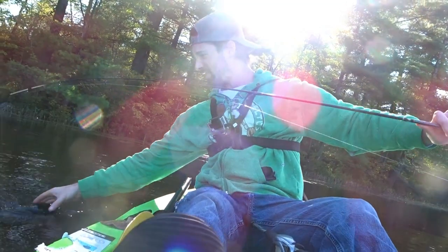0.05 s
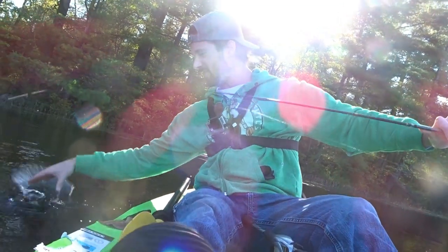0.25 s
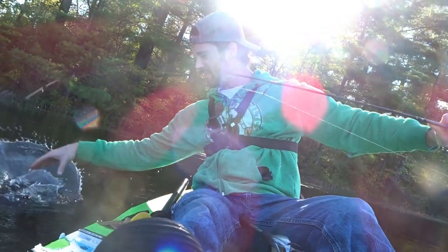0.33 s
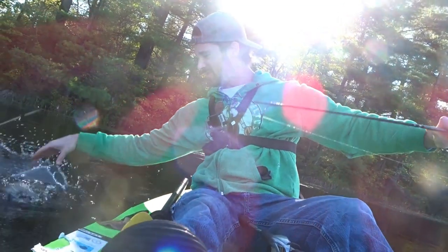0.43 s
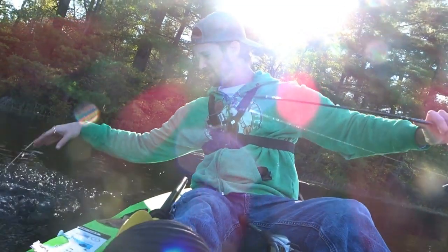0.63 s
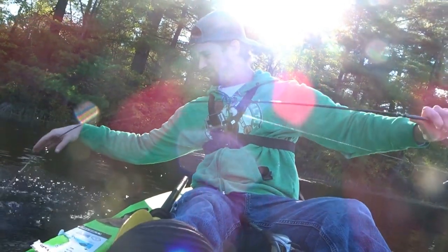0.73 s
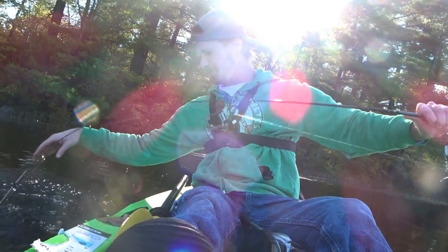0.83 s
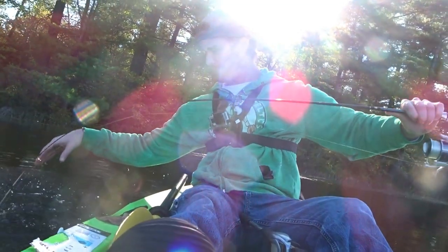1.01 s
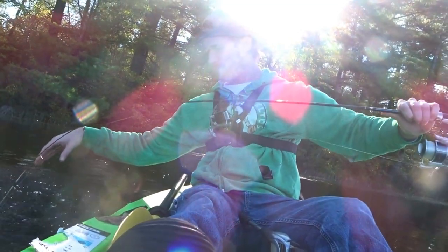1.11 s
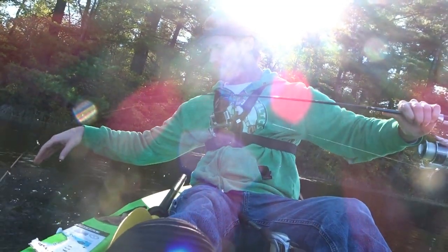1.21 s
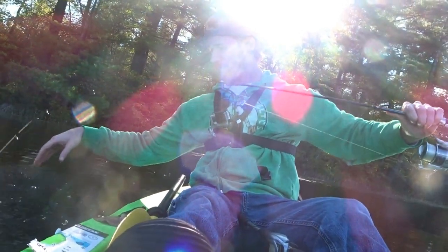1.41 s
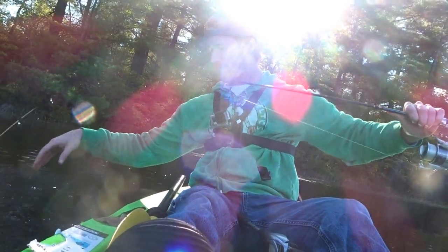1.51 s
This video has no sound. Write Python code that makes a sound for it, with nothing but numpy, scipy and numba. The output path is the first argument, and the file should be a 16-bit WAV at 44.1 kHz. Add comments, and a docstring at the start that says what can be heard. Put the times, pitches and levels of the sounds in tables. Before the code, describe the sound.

Fish splashing beside a small boat: quick wet slaps, bubbly plops and spray, settling into faint outdoor hush

```python
"""A quiet pond, heard from a boat: a hooked fish thrashes at the surface, close by on the right.
Slaps trap air in bubbles, each a short decaying sine that slides in pitch, most of them upwards.
Filtered noise bursts make the sharp drops; crowds of tiny random rings make the fizz, spray and mist.
The water settles over a far-off hush of shaped noise. The small camera's mic pair is steered: the
splash is duller in the left channel, where it leads in phase at most pitches."""
import sys
import numpy as np
from scipy import signal
from scipy.fft import rfft, irfft
from scipy.io import wavfile
from scipy.ndimage import uniform_filter1d
from numba import njit

SR = 44100
rng = np.random.default_rng(int(sys.argv[2]) if len(sys.argv) > 2 else 0)


def generate_wav(sig):
    """Save sig (samples, or channels by samples) to the path in sys.argv[1] as 16-bit PCM at SR."""
    pcm = np.round(np.clip(np.atleast_2d(sig).T, -1, 1) * 32767).astype(np.int16)
    wavfile.write(sys.argv[1], SR, pcm)


N = 68355  # length in samples

ROUNDING = 1.05  # decay exponent of small bubbles: above 1 they hold a moment, then die faster


def undb(db):
    """Decibels to gain."""
    return 10 ** (np.asarray(db) / 20)


def along(table):
    """Spread the columns of a table over the spectrum, on a log-frequency axis."""
    log_hz = np.log(np.arange(N // 2 + 1) * SR / N + 1.)
    rows = np.array(table, float)
    return [np.interp(log_hz, np.log(rows[:, 0]), column) for column in rows[:, 1:].T]


def band_filter(x, order, hz, kind):
    """Butterworth filter."""
    return signal.sosfilt(signal.butter(order, hz, kind, fs=SR, output="sos"), x)


def smooth_noise(hz):
    """Slow random wavering with unit spread: noise averaged over 1 / hz seconds."""
    noise = uniform_filter1d(rng.standard_normal(N), int(SR / hz))
    return noise / noise.std()


@njit
def ring(n, sr, peak, hz, gain, tau, glide, rise, phase, shape):
    """Ringing air pockets: sines that swell briefly, die away and slide exponentially in pitch."""
    out = np.zeros(n)
    for k in range(len(hz)):
        angle = phase[k]
        start = int((peak[k] - rise[k]) * sr)
        stop = int((peak[k] + 6 ** (1 / shape) * tau[k]) * sr)
        for i in range(max(start, 0), min(n, stop)):
            t = i / sr - peak[k]
            angle += 2 * np.pi * min(hz[k] * np.exp(glide[k] * t), sr / 2.2) / sr
            if t > 0:
                envelope = np.exp(-(t / tau[k]) ** shape)
            else:
                envelope = np.cos(np.pi / 2 * t / rise[k]) ** 2
            out[i] += gain[k] * envelope * np.sin(angle)
    return out


def hush():
    """Distant wind and traffic: shaped noise that wavers a little, most alike in both channels near 200 Hz."""
    # Colour of the hush. Each row: frequency in Hz, relative level per Hz in dB.
    hush_colour = [(18, -73.5), (30, -36), (81, -32), (148, -18.5), (192, -21.5), (284, -12), (518, -6),
                   (728, -8.5), (830, -6), (1440, -22), (1550, -21), (4540, -27), (6370, -27.5),
                   (15500, -39)]
    # Its spread. Each row: frequency in Hz, left minus right in dB, left phase lead in radians,
    # likeness of the channels from 0 to 1.
    hush_spread = [(60, -5.5, .3, 0.4), (200, 0, 0.39, .9), (600, -4, 1, 0.6), (1010, -7, 0.64, .7),
                   (1600, -5.5, 2, .33), (3000, -4, 1.8, .1), (7000, -7, 1.5, 0), (14000, -5, 1.5, .05)]
    level_db, flicker_db = -59, 1.  # overall level; size of the random steps before smoothing
    step = SR // 10
    steps = np.repeat(rng.standard_normal(N // step + 1), step)
    waver = undb(flicker_db * uniform_filter1d(steps, step)[:N])
    noise = rng.standard_normal((2, N)) * waver
    right, stranger = rfft(noise) * undb(along(hush_colour)[0])
    db, lead, alike = along(hush_spread)
    alike = np.clip(alike, 0, 1)
    shared = alike * np.exp(1j * lead) * right
    left = undb(db) * (shared + np.sqrt(1 - alike ** 2) * stranger)
    out = irfft(np.array([left, right]), N)
    return out * undb(level_db) / np.sqrt(np.mean(out.mean(axis=0) ** 2))


def banks_return(water):
    """Faint return from the banks: the splash smeared by a decaying noise tail for each channel."""
    t60_s, level_db = .6, -24
    t = np.arange(SR // 2) / SR
    fade = undb(-60 * t / t60_s) * np.minimum(t / .02, 1)
    tail = rng.standard_normal((2, len(t))) * fade
    tail = tail / np.sqrt(np.sum(tail[0] ** 2))
    return signal.fftconvolve(water[None], tail, axes=1)[:, :N] * undb(level_db)


def churn():
    """Crowds of tiny random rings - small bubbles, spray and mist - that swell with each thrash and fade."""
    # Thrashes. Each row: start in seconds, small bubbles in dB, spray in dB, mist in dB,
    # rise in seconds, fade of the level by 60 dB in seconds.
    thrashes = np.array([(.066, -52.5, -53.5, -61.5, 0.031, 1.5), (0.124, -56, -50.5, -61, 0.0025, 0.16),
                         (0.163, -53.5, -54.5, -65, 0.0016, 0.6), (0.237, -30.5, -27, -42, .003, 0.26),
                         (.277, -34.5, -61, -58, 0.0041, 0.77), (0.303, -42.5, -36, -45, 0.0036, 0.22),
                         (0.317, -30.5, -26.5, -47, 0.0016, 0.34), (0.351, -42, -39, -46, 0.021, 0.44),
                         (0.401, -33, -38.5, -49.5, 0.01, 0.32), (0.446, -45, -31, -43, 0.0045, .4),
                         (0.483, -35, -27, -59.5, 0.0071, 0.27), (0.513, -28.5, -46, -38, 0.0079, 0.13),
                         (.57, -52.5, -37, -47.5, 0.0085, 0.43), (.604, -50.5, -46, -49, 0.0046, .5),
                         (0.638, -43, -39, -56, 0.0044, 0.35), (.70, -48, -49.5, -53, 0.015, 0.8),
                         (0.774, -48, -52.5, -60.5, 0.0064, 0.43), (.88, -67, -69.5, -63.5, 0.034, 2.4)], float)
    # The three crowds. Each row: grains per second, lowest pitch in Hz, highest pitch in Hz,
    # scale of the ring in cycles, scale of the size scatter in dB.
    crowds = [(1500, 670, 2200, 6.6, 5), (4500, 1800, 6500, 6.9, 4.5), (7000, 5500, 11000, 5, 3.5)]
    patter_db, patter_hz = 2.5, 220  # spray and mist fall in handfuls
    loudest_grain, calm_s = 2.5, 1.25  # cap on the scatter draw; no grain starts after calm_s
    attack_cycles = 2.1
    since = np.maximum(np.arange(N) / SR - thrashes[:, :1], 0)
    swell = np.minimum(since / np.maximum(thrashes[:, 4:5], .001), 1) ** 2
    power = swell * undb(-120 * since / thrashes[:, 5:])  # the root taken below halves -120 to -60 dB
    patter = undb(patter_db * np.clip(smooth_noise(patter_hz), -2, 2))
    out = 0
    for k, (rate, lo_hz, hi_hz, cycles, scatter_db) in enumerate(crowds):
        u = rng.random((20000, 5))
        s = np.cumsum(-np.log(1 - u[:, 0])) / rate  # random gaps between grains
        u, s = u[s < calm_s], s[s < calm_s]
        hz = lo_hz * (hi_hz / lo_hz) ** u[:, 1]
        tau = cycles * (0.31 + u[:, 2]) / hz / 2
        size = undb(scatter_db * np.minimum(-np.log(1 - u[:, 3]), loudest_grain))
        glide = 0.12 / tau * u[:, 2]
        grains = ring(N, 1. * SR, s, hz, size, tau, glide, attack_cycles / hz, 2 * np.pi * u[:, 4], ROUNDING)
        grains = grains / np.sqrt(np.sum(grains ** 2) / (calm_s * SR))  # even level
        level = np.sqrt(undb(2 * thrashes[:, k + 1]) @ power)
        out = out + (patter if k else 1) * grains * level
    return out


def drops():
    """Drops that land with a sharp crack: each a burst of band-passed noise that dies within milliseconds."""
    # Each row: start in seconds, peak in dB, band centre in Hz, decay time constant in milliseconds.
    cracks = [(0.0686, -36, 3200, 0.33), (0.1247, -33.5, 5000, 0.69), (.1625, -46, 4930, .8),
              (.1675, -26.5, 7000, 1), (.2388, -46, 6000, 0.39), (0.251, -28, 6000, .4),
              (.3238, -13.5, 8000, 0.32), (0.3875, -19, 5500, 0.55), (.4935, -20.5, 9000, .6),
              (.532, -31, 9000, .6), (.5586, -14.5, 2400, 0.18), (0.57, -36, 4000, .4),
              (.578, -24, 9000, .6), (.5865, -35, 5500, .5), (.591, -46, 11100, .4), (.64, -42, 8000, .5),
              (.6768, -32, 3500, .3), (0.712, -31, 4100, .4), (.72, -40, 10500, .5), (.741, -42, 8400, .4),
              (.782, -44, 10000, .5), (.4595, -39, 8500, .6), (.393, -28, 8000, .5),
              (0.243, -16, 2500, 0.54), (.5012, -18.5, 950, 0.83), (.606, -24, 6300, 0.45),
              (.62, -24.5, 7500, 0.71), (.6685, -33, 2800, 0.33), (.7352, -27, 3200, .4),
              (0.745, -34.5, 7900, 0.5), (0.7762, -30, 4500, .5), (.7985, -44, 11200, .5),
              (0.8278, -34.5, 3000, 0.28)]
    span, push = 1.6, 2.2  # band edges as a ratio of the centre; steady push under the noise
    out, t = np.zeros(N), np.arange(256) / SR
    for s, db, hz, ms in cracks:
        burst = (push + rng.standard_normal(len(t))) * np.exp(-1000 * t / max(ms, .1))
        burst = band_filter(burst, 2, [hz / span, min(hz * span, SR / 2.2)], "band")
        start = int(s * SR)
        out[start:start + len(t)] += undb(db) * burst / np.max(np.abs(burst))
    return out


def bubbles(big):
    """Each pocket of air snaps shut with a noise tick and rings; the big ones drone low and long."""
    # The loudest bubbles and drops. Each row: time of the peak in seconds, pitch at the peak in Hz,
    # level in dB, nominal ring time to -60 dB in seconds, glide in octaves per second.
    pockets = np.array([(0.0696, 1320, -41, 0.061, 26), (0.085, 2100, -36, 0.0069, -4),
                        (0.0928, 1040, -32.5, 0.026, -4), (0.1139, 940, -35.5, 0.018, -32),
                        (0.1135, 2850, -33.5, 0.015, -6), (0.1257, 4200, -42, 0.01, 6.0),
                        (0.132, 297, -42.5, 0.45, 1.5), (0.135, 660, -44.5, 0.071, -3),
                        (0.139, 2270, -43, 0.015, -13.5), (0.1675, 4320, -27.5, 0.0135, 14),
                        (0.1702, 1398, -21, 0.021, 5), (0.179, 1110, -36, 0.036, 38),
                        (0.24, 795, -27.5, 0.053, -6), (0.2411, 2530, -17, 0.01, -1),
                        (0.2423, 1500, -16, 0.015, 2.5), (0.2434, 2940, -8.5, 0.009, 7),
                        (0.2465, 3265, -11.5, 0.0225, -30.5), (0.2475, 1900, -16.5, 0.01, -1),
                        (0.2485, 2720, -11, 0.009, 3.5), (0.2578, 1116, -15.5, 0.03, 39.5),
                        (0.2619, 1320, -18, 0.0225, 4), (0.265, 5450, -33.5, 0.012, 4.5),
                        (0.2814, 1410, -24.5, 0.0262, 3), (0.2844, 734, -25, 0.05, 6.5),
                        (0.2855, 2490, -24, 0.039, -27.5), (0.305, 960, -26.5, 0.0375, 39.5),
                        (0.3057, 5170, -19.5, 0.0135, 6.0), (0.319, 1558, -12.5, 0.0525, 32.5),
                        (0.3211, 2550, -9.5, 0.0112, 6.0), (0.324, 9040, -21.5, 0.009, 6.5),
                        (0.3243, 5200, -22.5, 0.009, 5), (0.3248, 1720, -12.5, 0.0165, 4.5),
                        (0.327, 2600, -22, 0.015, 18), (0.3362, 2000, -11.5, 0.0112, -40.5),
                        (0.3497, 4700, -23.5, 0.0075, 5.5), (0.352, 800, -28, 0.04, 3),
                        (0.3621, 1760, -15, 0.012, 1.5), (0.364, 886, -20.5, 0.0225, 5.5),
                        (0.372, 335, -49.5, 0.15, 4), (0.3736, 1487, -7, 0.012, -28),
                        (0.3738, 4490, -28, 0.021, 7), (0.377, 1047, -17, 0.0375, 5.5),
                        (0.3895, 3780, -22, 0.0187, 5.5), (0.393, 6100, -31, 0.01, 6.0),
                        (0.398, 350, -46, 0.3, 3), (0.404, 6350, -26.5, 0.0075, 6.0),
                        (0.405, 653, -32, 0.08, 10.5), (0.4081, 3360, -22.5, 0.0112, 5),
                        (0.4233, 4850, -18.5, 0.009, 5), (0.4273, 879, -23.5, 0.054, 4.5),
                        (0.443, 4300, -27, 0.015, 2), (0.4538, 4810, -18, 0.009, 6.0),
                        (0.4603, 3000, -35, 0.06, 6.0), (0.4656, 2330, -23, 0.0187, -35),
                        (0.469, 2270, -20, 0.02, -10), (0.472, 1650, -24, 0.06, -3),
                        (0.4862, 1500, -14, 0.0065, 9), (0.4861, 2520, -12.5, 0.017, 24),
                        (0.4922, 2355, -10.5, 0.012, 0), (0.492, 9000, -30, 0.012, 14),
                        (0.5024, 1082, -4.5, 0.02, 4.5), (0.5059, 1300, -11.5, 0.027, 4),
                        (0.512, 600, -29, 0.053, 8), (0.5162, 2685, -20.5, 0.055, 3),
                        (0.5236, 1355, -22.5, 0.027, 12), (0.526, 850, -23, 0.01, 4),
                        (0.527, 1037, -31, 0.03, -6), (0.5325, 2310, -23, 0.013, 1),
                        (0.5441, 5600, -30, 0.0058, 6.0), (0.549, 1604, -34.5, 0.04, -3),
                        (0.5554, 2330, -29.5, 0.018, 10), (0.5589, 365, -49.5, 0.6, 1),
                        (0.5707, 2860, -33.5, 0.027, 13), (0.5767, 4270, -32, 0.017, 8),
                        (0.578, 9300, -40, 0.008, 9), (0.585, 838, -34.5, 0.057, 5.5),
                        (0.588, 3530, -26.5, 0.016, 9), (0.6065, 3233, -14.5, 0.0093, 11),
                        (0.6066, 1337, -25, 0.037, 11), (0.6096, 794, -29.5, 0.09, 9),
                        (0.62, 2840, -29, 0.017, -3), (0.622, 1350, -33, 0.03, -5),
                        (0.642, 3200, -25.5, 0.014, 7), (0.6779, 3360, -26, 0.0165, 11),
                        (0.704, 4360, -28.5, 0.012, 12), (0.712, 4040, -38, 0.013, 4),
                        (0.7201, 10080, -38, 0.0069, 6.0), (0.727, 7550, -41.5, 0.009, 8),
                        (0.735, 2640, -26, 0.011, 28), (0.7438, 1750, -34, 0.03, 10),
                        (0.7567, 4490, -39, 0.021, 6.0), (0.7644, 5900, -42, 0.01, 0),
                        (0.7765, 3100, -33, 0.012, 0), (0.7808, 1820, -36.5, 0.0135, -1),
                        (0.8302, 1300, -37, 0.017, 13), (0.9788, 6100, -48.5, 0.0075, 2.5),
                        (1.3432, 8070, -49.5, 0.0063, 4.5)], float)
    big_below_hz = 450
    attack_cycles, snap_db, snap_ms = 2.2, -30, 0.32  # tick: level against the ring, decay constant
    wobble, wobble_hz = 0.46, 350  # small bubbles jostle: depth and speed of their tremor
    s, hz, db, t60, octaves = pockets[(pockets[:, 1] < big_below_hz) == big].T
    phase = 2 * np.pi * rng.random(len(s))
    rise = (1 if big else attack_cycles) / hz
    tau = np.maximum(t60, .003) / np.log(1000)
    shape = 1. if big else ROUNDING
    tones = ring(N, 1. * SR, s, hz, undb(db), tau, np.log(2) * octaves, rise, phase, shape)
    if not big:
        tones = tones * (1 + wobble * smooth_noise(wobble_hz))
    ticks = np.zeros(N)
    np.add.at(ticks, ((s - rise / 2) * SR).astype(int), undb(db + snap_db))
    fade = np.exp(-np.arange(400) / (snap_ms * SR / 1000))
    return tones + signal.fftconvolve(ticks, fade)[:N] * rng.standard_normal(N)


def splash():
    """All the water close by: small sounds echo off the hull, and the camera housing dulls the treble."""
    # Treble fall-off of the housing. Each row: frequency in Hz, gain in dB.
    housing_loss = [(5000, 0), (9500, -1.5), (11500, -6.5), (15000, -15.5)]
    low_cut_hz, echo_ms, echo_db = 486, 4.6, -20.5
    water = band_filter(bubbles(False) + churn() + drops(), 4, low_cut_hz, "high")
    echo = undb(echo_db) * np.roll(water, int(echo_ms * SR / 1000))
    water = water + echo + bubbles(True)  # the big bubbles skip the low cut and the echo
    return irfft(rfft(water) * undb(along(housing_loss)[0]), N)


def scene():
    """Splash and its return from the banks through a mic pair, the left one steered away, over the hush."""
    # Left channel against right for the splash. Each row: frequency in Hz, level in dB,
    # phase lead in radians.
    left_pickup = [(150, -17.5, .6), (350, -1.5, 1.6), (700, -4.5, 1.28), (1300, -6, 1.29),
                   (2400, -12, .96), (3100, -16, 1.8), (4050, -26.5, -.7), (4950, -24, 1.9),
                   (9000, -26.5, 0.28), (14000, -26, .8)]
    water = splash()
    banks = banks_return(water)
    db, lead = along(left_pickup)
    left = irfft(rfft(water) * undb(db) * np.exp(1j * lead), N)
    banks[0] = irfft(rfft(banks[0]) * undb(db / 2), N)  # the return is cut half as much in dB
    return np.array([left, water]) + banks + hush()


def record(dry):
    """The camera cuts the top: a steep elliptic low-pass at 15850 Hz."""
    return signal.sosfilt(signal.ellip(12, .2, 70, 15850, fs=SR, output="sos"), dry)


dry = scene()
out = record(dry)
generate_wav(out)
```